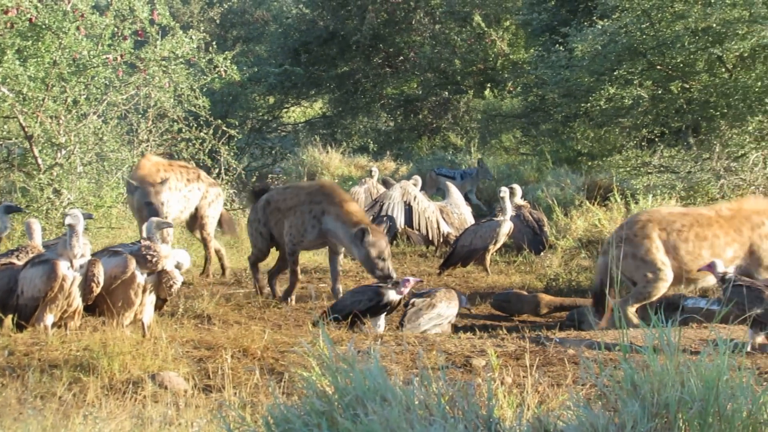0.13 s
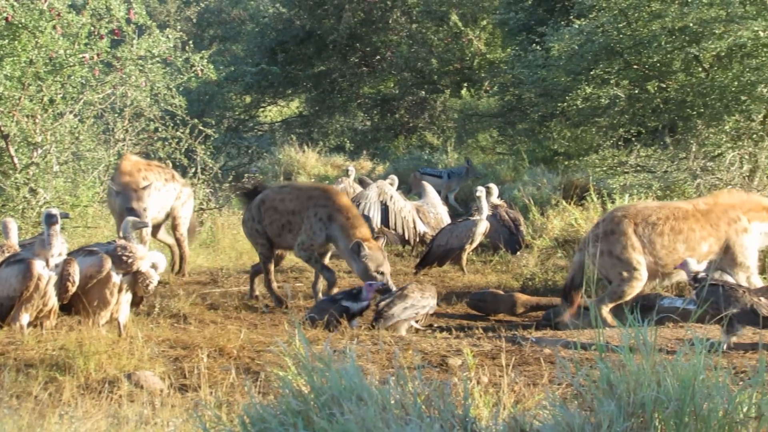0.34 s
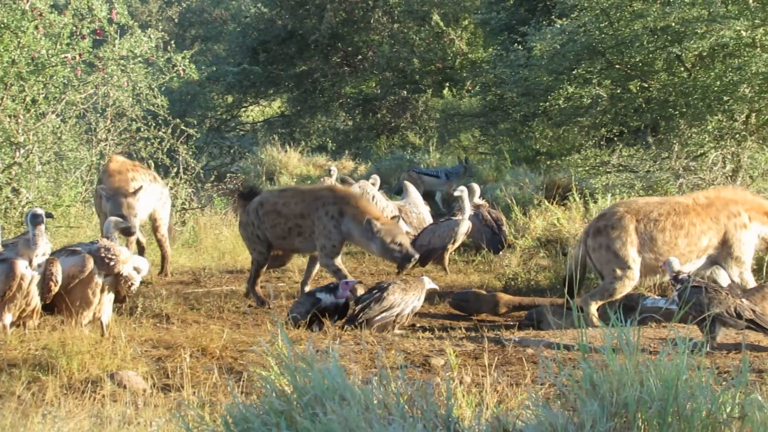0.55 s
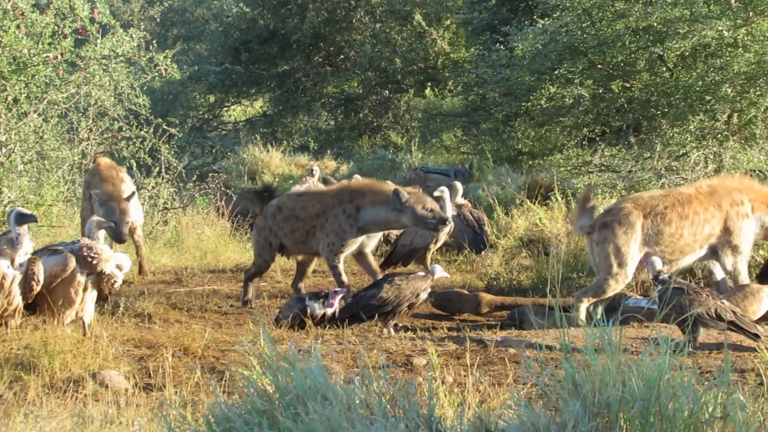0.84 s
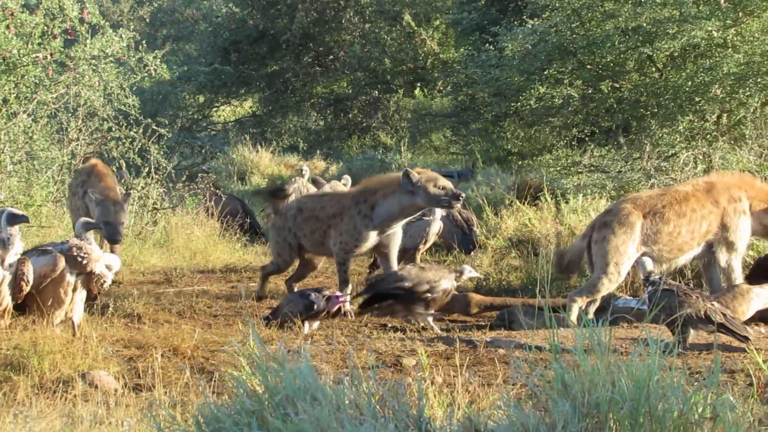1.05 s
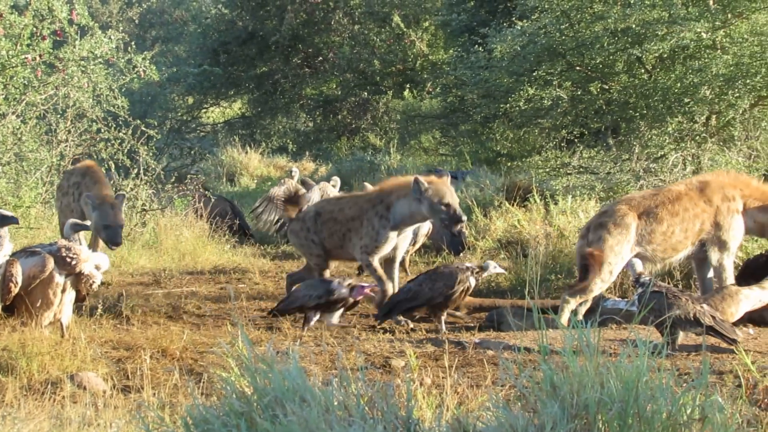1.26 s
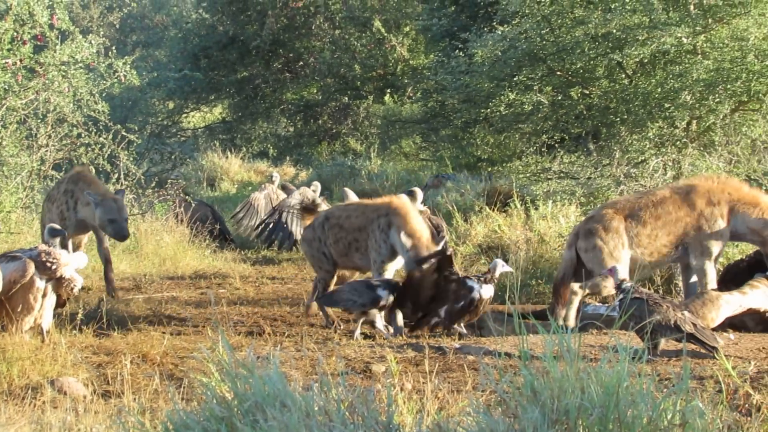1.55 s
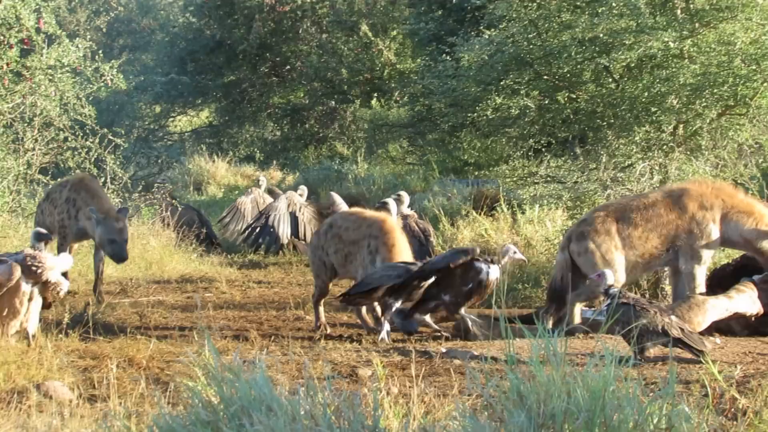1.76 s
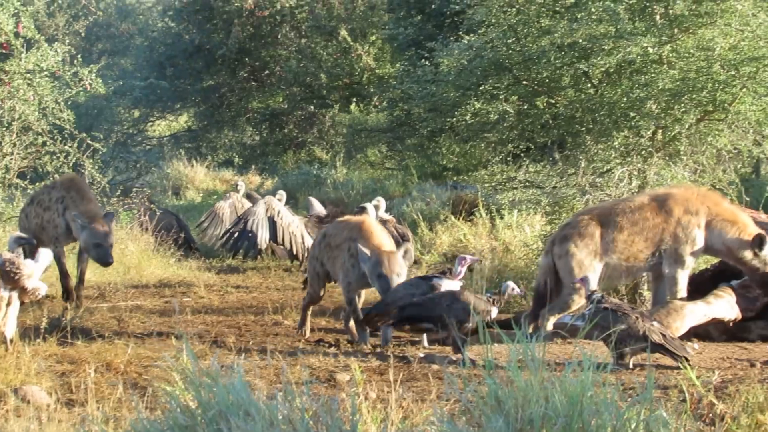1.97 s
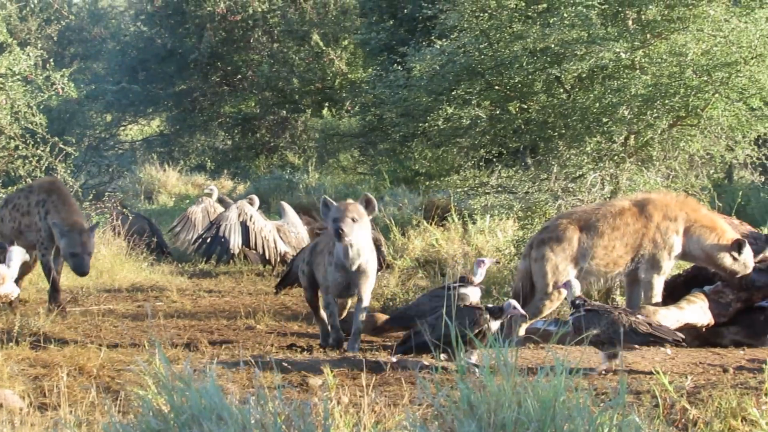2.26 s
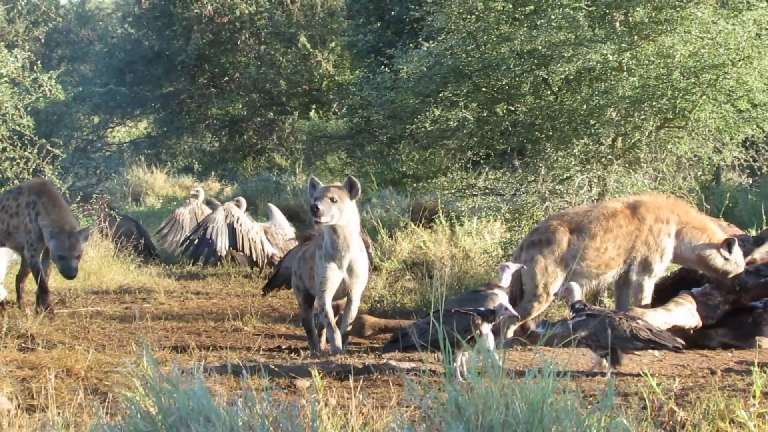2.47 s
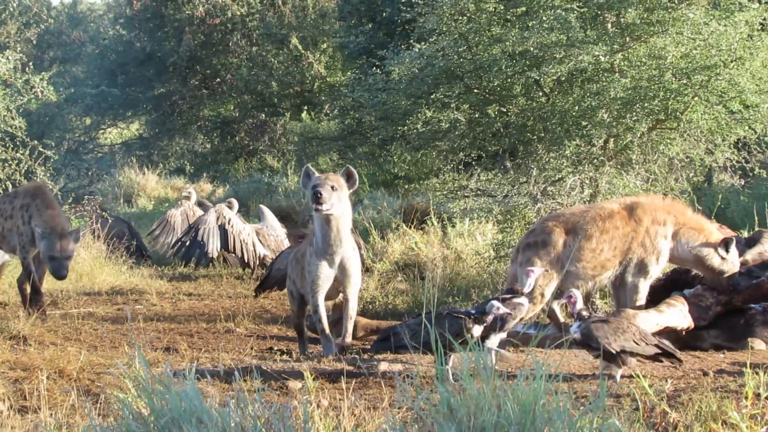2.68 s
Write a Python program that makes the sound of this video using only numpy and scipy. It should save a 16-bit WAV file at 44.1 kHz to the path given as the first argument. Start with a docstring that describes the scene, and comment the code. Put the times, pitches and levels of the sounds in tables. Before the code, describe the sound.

Rapid hyena giggling outdoors with snapping twigs, later hoarse vulture squawks and one short yelp

```python
"""A knock, snapping twigs and faint bird whistles come first; then a hyena giggles in seven quick squeals.
Hyenas and vultures squabble at a carcass in open bush, a little to the right. The hyena later yelps once.
The calls are harmonics and noise shaped by a throat; most hyena notes start clearer and break into a rasp.
Steps and twigs are short bursts of noise, dry grass is made of tiny clicks, and bird whistles are gliding
sines. Soft filtered noise is the outdoor air; the ground and bushes scatter the calls and steps."""
import sys
import numpy as np
from scipy import signal
from scipy.fft import rfft, irfft
from scipy.io import wavfile

SR = 44100
rng = np.random.default_rng(int(sys.argv[2]) if len(sys.argv) > 2 else 0)


def output_pcm(signal):
    """Save a mono or channel-first signal as 16-bit PCM at the path in sys.argv[1].

    Samples are clipped to [-1, 1] before scaling.
    """
    pcm = np.clip(np.atleast_2d(signal).T, -1, 1) * 32767
    wavfile.write(sys.argv[1], SR, np.round(pcm).astype(np.int16))


N = 123480  # length of the scene in samples (2.8 s)


def undb(db):
    """Turn decibels into a gain."""
    return 10 ** (np.asarray(db) / 20)


def unit(x):
    """Scale a sound to an average (rms) strength of 1."""
    return x / np.sqrt(np.mean(x ** 2) + 1e-18)


def curve(points, hz):
    """Read between (hz, value) points, with frequency on a logarithmic scale."""
    points = np.array(points, float)
    return np.interp(np.log(hz + 1), np.log(points[:, 0]), points[:, 1])


def colour(x, db_at):
    """Filter a sound with a function that gives the dB for each frequency."""
    size = x.shape[-1]
    gain = undb(db_at(np.fft.rfftfreq(size, 1 / SR)))
    return irfft(rfft(x) * gain, size)


def band(x, hz, octaves):
    """Keep a bell-shaped band around hz, at rms 1."""
    def bell_db(f):
        distance = np.log2((f + 1) / hz) / octaves
        return -40 * np.log10(1 + distance ** 2 / 2)
    return unit(colour(x, bell_db))


def walk(rate, size):
    """Wander along straight lines between random values, with `rate` new values a second."""
    at = np.arange(size) * rate / SR
    return np.interp(at, np.arange(size), rng.standard_normal(size))


def pan(x, db):
    """Place a sound by its left-minus-right level in dB; negative is to the right."""
    gains = undb(np.array([[db], [-db]]) / 2)
    return x * gains / gains.mean()


def add(out, x, start_s):
    """Mix x into out from a start time, cutting what falls outside."""
    i = int(round(start_s * SR))
    x = x[..., max(-i, 0):N - i]
    first = max(i, 0)
    out[..., first:first + x.shape[-1]] += x


def swell(t, rise_s, fall_s):
    """A bell with its peak at t = 0 and its own rise and fall times."""
    return np.exp(-(t / np.where(t < 0, rise_s, fall_s)) ** 2)


def voice(hz, rough):
    """Throat tone of 22 harmonics; roughness shakes its period and strength and adds pulsing breath."""
    jitter, rasp_noise = 0.069, 0.81  # shares of pitch and of tone strength, at roughness 1
    shimmer_depth, shimmer_per_s = 0.61, 253
    size = len(hz)
    shaken_hz = hz * (1 + jitter * rough * walk(651, size))
    phase = 2 * np.pi * np.cumsum(shaken_hz) / SR
    tone = unit(sum(np.cos(k * phase + 2 * np.pi * rng.random()) for k in range(1, 23)))
    # the breath is strongest once in each cycle of the tone
    breath = unit(rng.standard_normal(size) * (1 + 0.52 * np.cos(phase)))
    shimmer = np.exp(shimmer_depth * np.minimum(rough, 1) * np.tanh(walk(shimmer_per_s, size)))
    mix = tone + rasp_noise * rough * breath
    return shimmer * mix / np.sqrt(1 + (rasp_noise * rough) ** 2)


def hyena(notes, throat, attack_s):
    """A note arches in pitch, then catches: its chest tone fades, its treble drops and its roughness grows."""
    # left-minus-right level of the voice at each pitch: hz, level_db
    voice_pan = [(700, 2), (1500, -0.5), (2300, -6.5), (2900, -11), (4400, -6.5), (6000, -5), (7900, -21.5),
                 (9200, -2), (11000, 22.5)]
    mouth_peak_db, mouth_width_hz = 6.5, 227
    break_s, pitch_move_s, release_s = 0.0063, 0.0085, 0.015
    dip_db, dip_s = -2.5, 0.0047  # brief dip in level at the break
    chest_fade_s = 0.0064
    treble_from_hz, rough_treble_db = 4200, -4.5
    hiss_from_hz, hiss_db = 2300, -9  # level for a clear part of roughness 0.11
    lead_in_s, lead_in_db = 0.0035, -15  # soft start ahead of the note
    out = np.zeros((2, N))
    t = np.arange(2 ** 12) / SR - .01
    for start, clear, rasp, top_hz, end_hz, clear_db, rasp_db, mouth_hz, treble_db, chest_db, rough in notes:
        broken = np.clip((t - clear) / break_s + .5, 0, 1)  # 0 is clear, 1 is broken

        # longer clear parts bend more, up to a limit
        bend = 0.0881 * min(clear / 0.02007, 2)
        arch_hz = top_hz * (1 - bend * np.clip(2 * t / clear - 1, -1, 1) ** 2)
        hz = arch_hz + (end_hz - arch_hz) * np.clip((t - clear) / pitch_move_s + 0.26, 0, 1)
        source = voice(hz, rough + broken * 0.7 * np.sqrt(abs(rough) / 0.23))
        hiss = rng.standard_normal(len(t))
        hiss = colour(hiss, lambda f: -20 * np.clip((hiss_from_hz - f) / 500, 0, 1))
        source = source + hiss * undb(hiss_db) * rough / 0.11

        def mouth(f):
            peak = np.exp(-.5 * ((f - mouth_hz) / mouth_width_hz) ** 2)
            bright = np.clip((f - 3000) / 1000, 0, 1)
            return curve(throat, f) + mouth_peak_db * peak + treble_db * bright

        # split the note so that chest, middle and treble can change separately
        note = unit(colour(source, mouth))
        chest = colour(note, lambda f: -40 * np.clip((f - 1500) / 600, 0, 1))
        treble = colour(note, lambda f: -40 * np.clip((treble_from_hz - f) / 1000, 0, 1))
        squeal = note - chest - treble + treble * undb(rough_treble_db * broken)

        effort_db = clear_db + (rasp_db - clear_db) * broken + dip_db * swell(t - clear, dip_s, dip_s)
        release = np.clip((clear + rasp - t) / release_s + .5, 0, 1)
        squeal = squeal * undb(effort_db) * release
        chest = chest * undb(clear_db + chest_db) * np.exp(-np.maximum(t - clear, 0) / chest_fade_s)
        lead_in = undb(lead_in_db) * np.exp(np.minimum(t, 0) / lead_in_s)
        note = (squeal + chest) * np.maximum(np.clip(t / attack_s, 0, 1), lead_in)
        sides = [colour(note, lambda f: side * curve(voice_pan, f) / 2) for side in (1, -1)]
        add(out, np.array(sides), start + t[0])
    return out


def hyena_giggle():
    """Seven quick squeals from one throat, each with a fast attack."""
    # giggle notes: start_s, clear_part_s, rough_part_s, top_pitch_hz, end_pitch_hz, clear_level_db,
    # rough_level_db, mouth_resonance_hz, treble_db, chest_db (against clear level), clear_roughness (0-1)
    squeals = [ (0.323, 0.03, 0.02, 804, 735, -34, -39.5, 2240, -3, -4.5, 0.08),
               (0.408, 0.011, 0.011, 814.4, 684, -31, -40, 2360, 3, 2.5, 0),
               (0.472, 0.013, 0.017, 790.3, 745, -32.5, -38.5, 2300, 2.5, 7, 0.31),
               (0.553, 0.0071, 0.025, 755.5, 757, -32, -37, 2430, 9, 4.5, 0.17),
               (0.633, 0.01174, 0.019, 750, 723.5, -32.5, -35, 2260, 8.5, 4.5, 0.26),
               (0.7365, 0.01477, 0.013, 691, 669, -35.5, -43.5, 2630, 10.5, 5.5, 0.16),
               (0.836, 0.0148, 0.027, 679.7, 680, -38.5, -38.5, 2490, 11, 7.5, 0.42)]
    # giggling throat: hz, level_db
    throat = [(300, -6.5), (700, -7), (1400, -8.5), (1850, 0), (2100, 9.5), (2800, 3.5), (3300, -1.5),
              (3650, -13.5), (4100, -11), (4800, -20), (5800, -20), (7000, -27), (8300, -26), (9000, -12),
              (12000, -39.5), (15500, -53)]
    return hyena(squeals, throat, attack_s=0.0032)


def hyena_yelp():
    """A single yelp through another throat shape, with a slower attack."""
    # yelp: start_s, clear_part_s, rough_part_s, top_pitch_hz, end_pitch_hz, clear_level_db,
    # rough_level_db, mouth_resonance_hz, treble_db, chest_db (against clear level), clear_roughness (0-1)
    yelps = [(2.4935, .0145, .024, 697, 539.4, -26, -38.5, 2230, 2, -3, 0.13)]
    # yelping throat: hz, level_db
    throat = [(300, -34), (700, -20), (1400, -11), (1750, -5.5), (2100, 2.5), (2750, -10.5), (3500, -18),
              (4150, -0.5), (4850, -9), (5300, -18), (6300, -25.5), (8000, -19.5), (9500, -23),
              (12500, -39), (15500, -47)]
    return hyena(yelps, throat, attack_s=0.014)


def vultures():
    """Hoarse squawks that swell and rise in pitch, with a thin wavering squeak at their height."""
    # squawks: peak_s, swell_s, fade_s, pitch_hz (at the peak), level_db, squeak_hz, squeak_level_db
    squawks = [(1.428, 0.036, 0.031, 395, -48, 2352, -63), (1.946, 0.034, 0.027, 381.2, -47.5, 2570, -49),
               (2.404, 0.029, 0.026, 385.5, -46.5, 2724, -42)]
    # vulture throat: hz, level_db
    beak = [(400, -41), (1000, -23), (1650, -6.5), (1950, -11.5), (2350, 1), (2680, 1), (3050, -2.5),
            (3550, -2), (3950, -12), (7000, -38), (12000, -50)]
    roughness, pitch_rise_per_s = 0.503, 1.8
    squeak_share, squeak_waver = 0.57, 0.024  # shares of the squawk's duration and of the squeak's pitch
    out = np.zeros(N)
    t = (np.arange(2 ** 13) - 2 ** 12) / SR
    for peak, rise, fall, hz, db, squeak_hz, squeak_db in squawks:
        source = voice(hz * np.exp(pitch_rise_per_s * t), roughness)
        rasp = unit(colour(source, lambda f: curve(beak, f)))
        rasp = rasp * swell(t, rise, fall) * undb(db)
        wavering_hz = squeak_hz * (1 + squeak_waver * walk(306, len(t)))
        squeak = unit(np.sin(2 * np.pi * np.cumsum(wavering_hz) / SR))
        squeak = squeak * swell(t / squeak_share, rise, fall) * undb(squeak_db)
        add(out, rasp + squeak, peak + t[0])
    return pan(out, -11.5)


def hits(rows, decay_s, octaves):
    """Short dead knocks: each noise burst dies away in one broad resonance."""
    out = np.zeros(N)
    t = np.arange(-2 ** 9, 2 ** 11) / SR
    for start, db, hz in rows:
        fade = np.exp(-abs(t) / decay_s) * (t >= 0)
        burst = band(rng.standard_normal(len(t)) * fade, hz, octaves)
        strength = np.sqrt(np.mean(fade ** 2))
        add(out, burst * strength * undb(db), start + t[0])
    return out


def footfalls():
    """Footfalls and knocks: low bursts with a short body resonance."""
    # footfalls and knocks: start_s, level_db, body_hz
    thuds = [(0.001, -45.5, 417), (0.206, -44, 430), (0.2535, -42, 614), (0.267, -37, 780),
             (0.272, -43.5, 300), (0.298, -45, 556), (0.625, -42, 485), (0.636, -57, 490),
             (1.043, -49.5, 606), (2.757, -50, 700)]
    return hits(thuds, decay_s=0.0037, octaves=0.84)


def twig_snaps():
    """Breaking twigs: very short, mostly high bursts, to the right."""
    # snaps: start_s, level_db, ring_hz
    snaps = [(0.0982, -37, 4000), (0.1425, -35.5, 4030), (0.1852, -37.5, 4600), (0.190, -42, 4730),
             (0.2136, -42, 7800), (0.2536, -33.5, 2820), (1.2175, -36, 2600), (1.8855, -41, 2280),
             (2.606, -50.5, 9000)]
    return pan(hits(snaps, decay_s=0.00061, octaves=0.54), -8)


def crackle(grain, size):
    """Dense tiny clicks of dry stalks, partly shared by left and right."""
    noise = rng.standard_normal((3, size))
    return unit((noise[:2] + noise[2]) * np.exp(grain * walk(900, size)))


def grass():
    """Steady trampling as coloured crackle, with a few quick scuffs of wings and feet."""
    # loudness of the trampling: time_s, level_db
    rustle = [(0, -53), (.04, -67.5), (.16, -55), (.30, -50.5), (.42, -54), (.53, -55), (.67, -52),
              (.79, -54.5), (.93, -50.5), (1.03, -50.5), (1.17, -50), (1.33, -56.5), (1.47, -56.5),
              (1.6, -61.5), (1.77, -56), (1.9, -69.5), (2.4, -65), (2.8, -64)]
    # colour of the trampled grass: hz, level_db
    grass_colour = [(300, -8), (700, -14.5), (1500, -10.5), (2700, 6.5), (3600, 2), (4600, 7), (6400, 1.5),
                    (8000, -6), (11000, -10), (15500, -24)]
    # scuffs through dry grass: peak_s, swell_s, fade_s, level_db, centre_hz, width_octaves
    scuffs = [(1.058, 0.013, 0.031, -46, 7260, 0.59), (1.090, 0.032, 0.02, -39.5, 6700, 2),
              (1.132, 0.026, 0.033, -44.5, 5500, 0.43), (1.221, 0.0095, 0.011, -49, 5500, 1.2),
              (2.758, .007, 0.018, -49, 4300, 2.6)]
    dull_from_hz, dull_db_per_octave = 8900, -19
    bed = unit(colour(crackle(0.16, N), lambda f: curve(grass_colour, f)))
    times_s, levels_db = np.array(rustle).T
    bed_db = np.interp(np.arange(N) / SR, times_s, levels_db) + walk(37.6, N)
    out = bed * undb(bed_db)
    t = (np.arange(2 ** 13) - 2 ** 12) / SR
    for peak, rise, fall, db, hz, octaves in scuffs:
        scuff = band(crackle(0.36, len(t)), hz, octaves)
        scuff = scuff * swell(t, rise, fall) * undb(db)
        scuff = colour(scuff, lambda f: dull_db_per_octave * np.log2(np.maximum(f / dull_from_hz, 1)))
        add(out, pan(scuff, -2), peak + t[0])
    return out


def birds():
    """Faint wavering glides, smeared on their way through the trees."""
    # distant whistles: start_s, length_s, start_hz, end_hz, level_db
    whistles = [(.005, 0.039, 7250, 7400, -62), (.025, 0.043, 4080, 4300, -57), (.06, .09, 4040, 2585, -50),
                (.15, 0.033, 2310, 2060, -51), (1.56, 0.13, 1920, 1760, -60), (1.96, 0.14, 3100, 2930, -53),
                (2.2, 0.078, 3380, 3020, -55), (2.265, 0.074, 2430, 2620, -60),
                (2.59, .11, 4500, 3580, -62), (2.725, 0.048, 2534, 2530, -47),
                (2.746, .03, 3290, 3320, -47)]
    waver, smear_s = 0.017, 0.0043  # waver is a share of the pitch
    out = np.zeros(N)
    t = np.arange(2 ** 13) / SR
    for start, length, from_hz, to_hz, db in whistles:
        along = np.clip(t / length, 0, 1)
        hz = (from_hz + (to_hz - from_hz) * along) * (1 + waver * walk(476, len(t)))
        tone = np.sin(2 * np.pi * np.cumsum(hz) / SR)
        add(out, tone * np.sin(np.pi * along) * undb(db), start)
    trees = unit(rng.standard_normal((2, len(t))) * np.exp(-t / smear_s)) / np.sqrt(len(t))
    return signal.fftconvolve(out[None], trees, axes=1)[:, :N]


def air():
    """Soft outdoor noise, wide in the bass, each octave flickering a little."""
    # colour of the air: hz, level_db (per Hz)
    air_colour = [(15, -44), (25, -11.5), (178, -2.5), (322, -2.5), (421, -3), (598, -2.5), (826, -4.5),
                  (1660, -7.5), (1900, -12), (2060, -7.5), (3260, -6.5), (3720, -13.5), (4750, -20),
                  (8130, -17.5), (15500, -27)]
    # width of the air: hz, side_minus_mid_db
    air_side = [(40, 12), (125, 7), (250, 6), (600, 3), (1200, 2.5), (3000, 0), (12000, 0.5)]
    level_db, flicker_db = -57, 0.18
    noise = 0
    for hz in 2. ** np.arange(5, 15):
        octave = lambda f: 10 * np.log10(np.maximum(1 - abs(np.log2((f + 1) / hz)), 1e-9))
        layer = colour(rng.standard_normal((2, N)), octave)
        noise = noise + layer * undb(flicker_db * walk(16, N))
    mid, side = colour(noise, lambda f: curve(air_colour, f))
    side = colour(side, lambda f: curve(air_side, f))
    return (mid + side * np.array([[1], [-1]])) / np.std(mid) * undb(level_db)


def outdoors(x):
    """Quick scatter from the ground and a thin tail from bushes, blurred by swaying leaves."""
    ground_decay_s, ground_db = .005, -2.5
    bush_t60_s, bush_db = 0.56, -16.02  # t60 is the time to fade by 60 dB
    leaf_blur_hz = 170
    t = np.arange(SR) / SR
    near = rng.standard_normal((2, SR)) * np.exp(-t / ground_decay_s) * (t > .0005)
    far = colour(rng.standard_normal((2, SR)), lambda f: -f / 1500)  # duller with rising frequency
    far = far * undb(-60 * t / bush_t60_s) * np.clip(t / 0.013, 0, 1)
    ground, bushes = (signal.fftconvolve(x, unit(r) / np.sqrt(SR), axes=1)[:, :N] for r in (near, far))
    # the leaves shift the tail's frequencies up and down at random
    sway = np.exp(2j * np.pi * np.cumsum(leaf_blur_hz * walk(400, N)) / SR)
    blurred = np.real(signal.hilbert(bushes) * sway)
    return x + ground * undb(ground_db) + blurred * undb(bush_db)


def scene():
    """Animals, twigs and steps in the open, over birds, grass and air."""
    calls = hyena_giggle() + hyena_yelp() + vultures()
    return outdoors(calls + footfalls()) + twig_snaps() + grass() + birds() + air()


def record(dry):
    """The recorder cuts the top, above 15750 Hz."""
    top_cut = signal.ellip(10, .2, 70, 15750, fs=SR, output="sos")
    return signal.sosfilt(top_cut, dry)


dry = scene()
out = record(dry)
output_pcm(out)
```